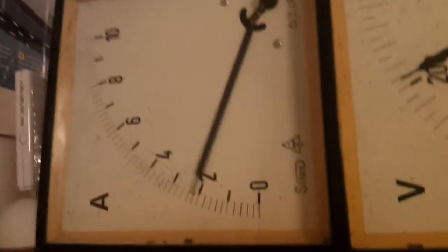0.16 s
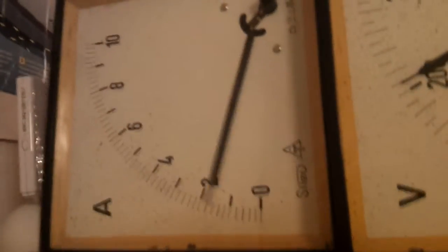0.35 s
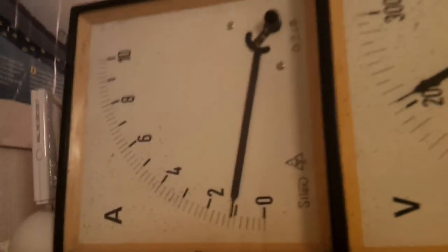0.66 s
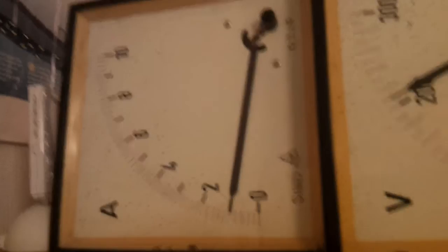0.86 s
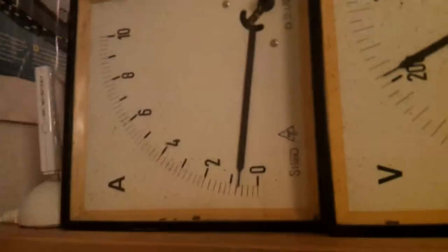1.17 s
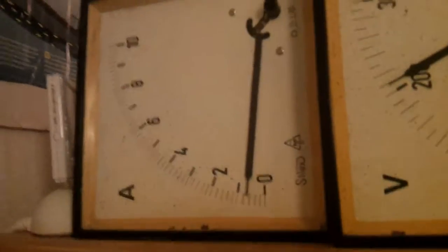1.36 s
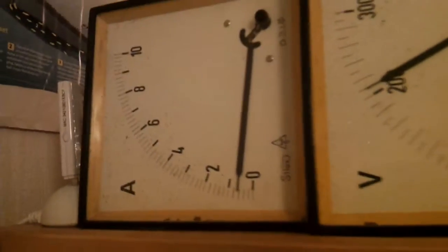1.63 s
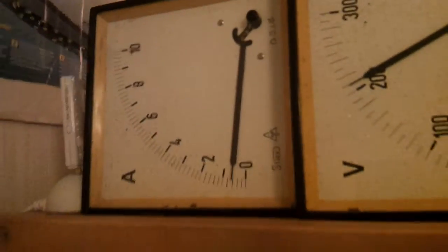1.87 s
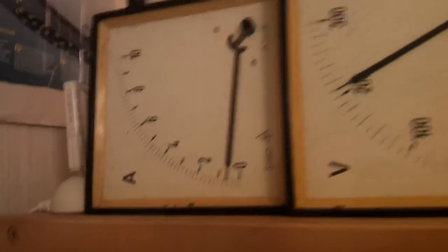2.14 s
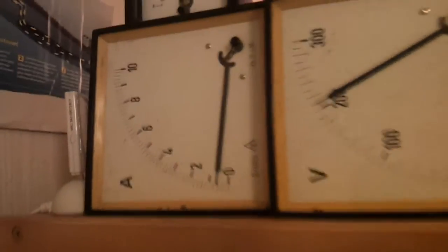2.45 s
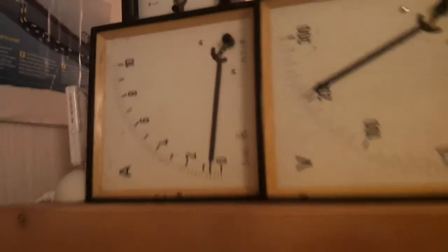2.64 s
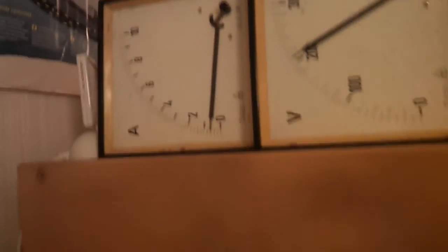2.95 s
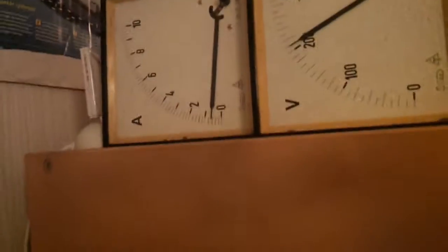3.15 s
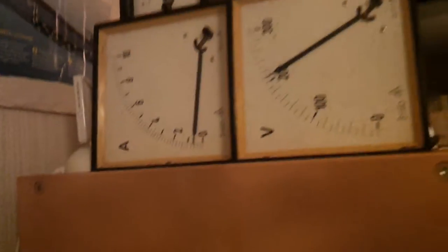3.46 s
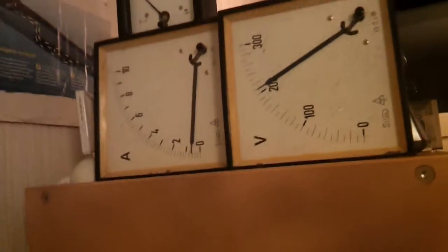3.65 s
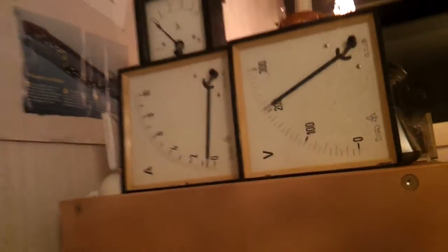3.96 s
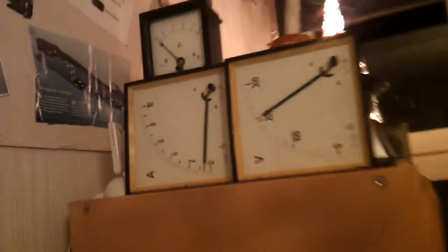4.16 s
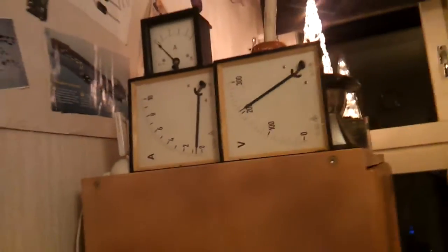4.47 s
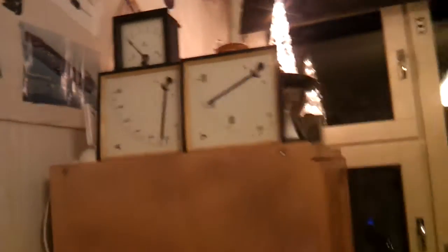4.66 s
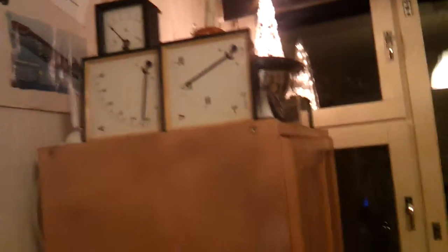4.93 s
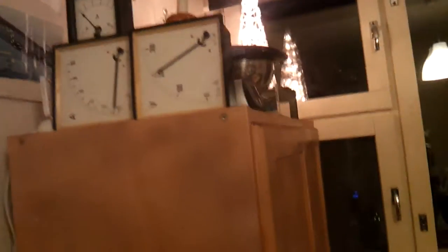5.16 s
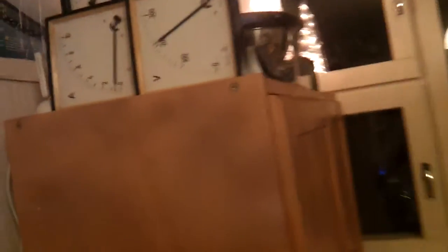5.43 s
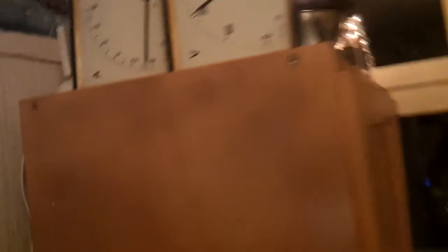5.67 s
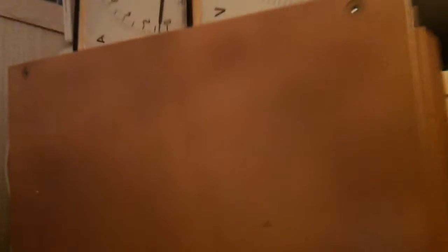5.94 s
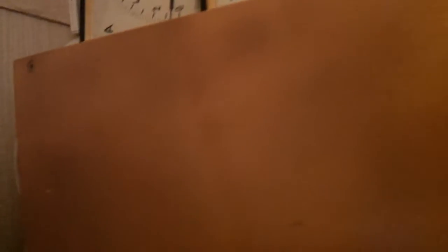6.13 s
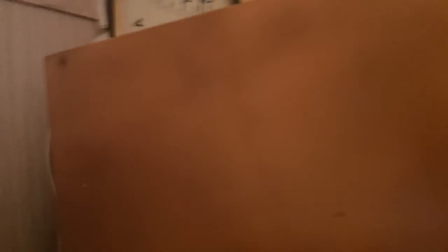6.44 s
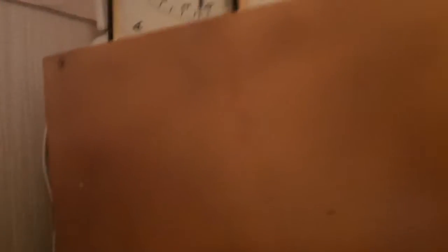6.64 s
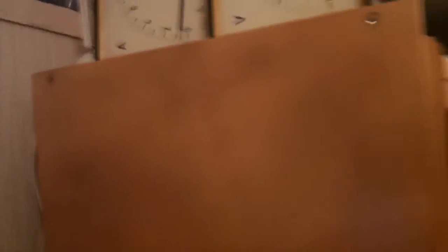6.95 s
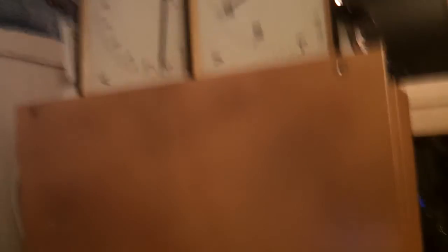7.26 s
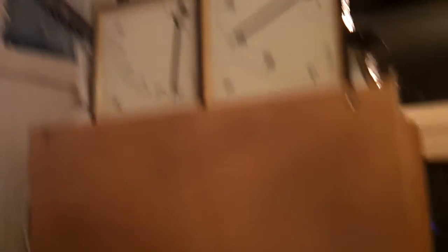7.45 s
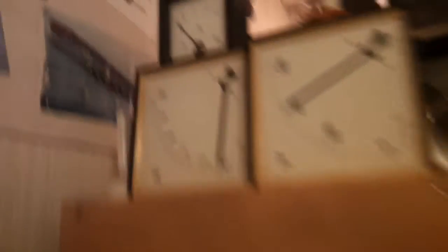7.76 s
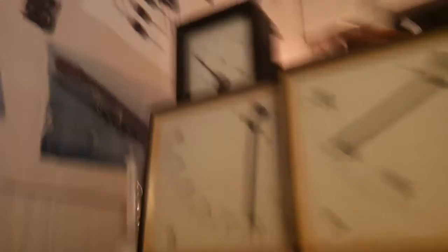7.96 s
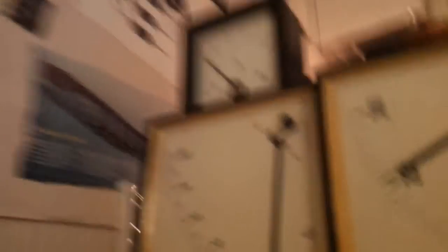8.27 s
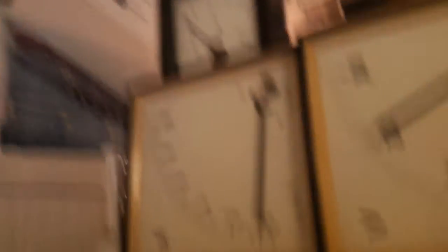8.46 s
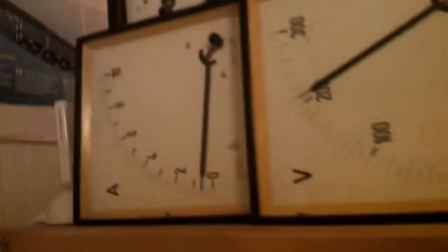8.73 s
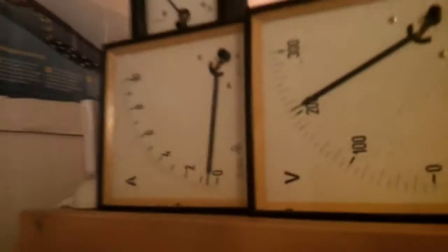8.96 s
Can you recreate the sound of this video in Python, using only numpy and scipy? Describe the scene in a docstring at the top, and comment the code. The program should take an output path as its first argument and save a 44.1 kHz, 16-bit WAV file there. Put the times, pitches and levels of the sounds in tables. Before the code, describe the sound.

Close hand-held pickup in a small, quiet room: a spinning motor runs down without power. A strong low hum, buzzing rasp and dry rubbing hiss drop smoothly in pitch and level, while a thin whistle sweeps down from the treble. One loud, hard snap comes late, preceded by a dull knock. The motor then fades to a low flutter and faint hiss, with soft bumps at the end.

```python
"""A fast motor, already switched off, hums and rasps down the scale in a small workshop, amid air and dry hiss.
The hum follows the shaft, the rasp repeats on every turn, and 36 rotor slots whistle as they drop into the band.
The tones swell across housing resonances and standing waves of the room, picked up by a hand-held microphone.
Late in the run-down a switch snaps once; dull handling knocks and a faint room drone lie around it."""
import sys
import numpy as np
from scipy import signal
from scipy.fft import rfft, irfft, next_fast_len
from scipy.io import wavfile

SR = 44100
rng = np.random.default_rng(int(sys.argv[2]) if len(sys.argv) > 2 else 0)


def wav_out(sig):
    """Save sig, one row per channel (or a flat mono array), as 16-bit PCM at SR to the path in sys.argv[1]."""
    wavfile.write(sys.argv[1], SR, np.round(np.clip(np.atleast_2d(sig).T, -1, 1) * 32767).astype(np.int16))


N = 401310
t = np.arange(N) / SR
SLOTS = 36  # rotor slots that pass on each turn
CONVERTER_HZ = 16000  # sampling rate of the narrow-band recorder

# how the housing radiates slot whistle and rasp: [f/Hz, level/dB]
HOUSING = [(100, -39), (250, -36), (500, -25), (650, -30), (780, -20.5), (950, -21), (1200, -23),
           (1600, -15.5), (2500, -11), (3500, -9.5), (4400, -9.5), (5500, -5), (6800, -1.5), (7500, -5.5),
           (8000, -18)]


def undb(db):
    """Decibels to gain."""
    return 10 ** (np.asarray(db) / 20)


def unit(x):
    """Scale to rms 1."""
    return x / np.sqrt(np.mean(x ** 2))


def curves(rows):
    """Each column of a table, joined by straight lines in time."""
    s, *columns = np.transpose(rows)
    return [np.interp(t, s, c) for c in columns]


def colour(x, points):
    """Filter by a spectrum of (Hz, dB) points, joined along a log frequency axis."""
    hz, db = np.transpose(points)
    size = next_fast_len(N + 4096)
    f = np.maximum(np.arange(size // 2 + 1) * SR / size, 1)
    gain = undb(np.interp(np.log(f), np.log(hz), db))
    return irfft(rfft(x, size) * gain, size)[:N]


def noise(points):
    """Coloured noise of rms 1."""
    return unit(colour(rng.standard_normal(N), points))


def walk(rate):
    """Random drift with a spread near 1: `rate` chance values a second, joined by straight lines."""
    return np.interp(t * rate, np.arange(2048), rng.standard_normal(2048))


def decay(s, t60, rise):
    """Envelope of a blow at time s: a rounded rise, then a fall of 60 dB in t60 seconds."""
    age = np.maximum(t - s, 0)
    fall = np.exp(-np.minimum(np.log(1000) * age / t60, 60))
    return (1 - np.exp(-age / rise)) * fall


def resonate(x, peaks):
    """Resonances (Hz, width Hz, dB) ring on top of what passes through; negative ones cut a notch."""
    out = x.copy()
    for hz, width, db in peaks:
        out += (undb(db) - 1) * signal.lfilter(*signal.iirpeak(hz, hz / width, fs=SR), x)
    return out


def ring_bodies(x):
    """Housing and bench ring where the sound meets their narrow resonances."""
    # housing and bench resonances: [f/Hz, width/Hz, boost/dB]
    bodies = [(390, 15, 8.5), (625, 45, 6), (1354, 16, 5.5), (1700, 200, 2.5), (2236, 29, 2.5),
              (2724, 90, 2), (3518, 62, 4), (4360, 160, 7)]
    return resonate(x, bodies)


def workshop(x, wet_db):
    """Direct sound plus dense treble reflections; a gliding tone beats with its own echoes."""
    t60_s = 0.19
    age = t[:SR // 2]
    tail = rng.standard_normal(len(age)) * np.exp(-np.log(1000) * age / t60_s)
    tail = signal.lfilter(*signal.butter(2, 1200, "high", fs=SR), tail)
    wet = signal.fftconvolve(x, tail / np.linalg.norm(tail))[:N]
    return (x + undb(wet_db) * wet) / np.hypot(1, undb(wet_db))


def room():
    """Quiet room: faint steady noise, with the body resonances in it, and a low drone that drifts in level."""
    # colour of the quiet room: [f/Hz, relative level/dB per Hz]
    quiet = [(20, -9.5), (70, -2.5), (130, -2.5), (220, -3.5), (390, 1.5), (500, -7), (650, 2), (900, -23),
             (1400, -21), (3000, -0.5), (8000, -20.5)]
    hiss = undb(-50.0) * unit(ring_bodies(noise(quiet)))
    drone = undb(-69.5 + 2 * walk(2.1)) * np.sin(2 * np.pi * 124 * t)
    return hiss + drone


def handling():
    """Soft knocks of handling: each blow rings at one pitch over a short scuff coloured around it."""
    # knocks: [t/s, level/dB, f/Hz]
    knocks = [(6.2, -39, 843), (8.53, -44.5, 263), (8.81, -42.5, 403), (9.03, -34.5, 391.6)]
    out = np.zeros(N)
    for s, db, hz in knocks:
        scuff = noise([(hz / 4, -16), (hz * .75, -5), (hz, 0), (hz * 1.4, -10), (hz * 3, -20), (hz * 12, -45)])
        out += undb(db) * decay(s, t60=0.28, rise=0.016) * (scuff + np.sin(2 * np.pi * hz * t))
    return out


def switch():
    """One snap in three close blows: lever modes ring, contacts crack and the cabinet thumps, each dying away."""
    # blows of the snap: [t/s, lever level/dB, crack level/dB, thump level/dB]
    blows = [(6.501, -21, -15, -47), (6.513, -16.5, -8.5, -37), (6.531, -21, -35, -33)]
    # ringing modes of the lever: [f/Hz, level/dB, t60/s]
    lever_modes = [(830, -1, .05), (1030, 7, 0.06), (1090, -4, 0.35), (1140, -27, .15)]
    # colour of the cracking contacts: [f/Hz, relative level/dB per Hz]
    crack_colour = [(60, -16), (250, -10.5), (500, -16.5), (1000, -5.5), (1800, -4.5), (3700, -7.5),
                    (5200, 1), (6500, -4), (7300, -12), (8000, -18)]
    # colour of the cabinet thump: [f/Hz, relative level/dB per Hz]
    thump_colour = [(30, -17), (85, -11), (100, -6), (135, 8), (235, -12), (330, -18), (1000, -25),
                    (4000, -59)]
    crack, thump, out = noise(crack_colour), noise(thump_colour), np.zeros(N)
    for s, lever_db, crack_db, thump_db in blows:
        for hz, db, t60 in lever_modes:
            ring = decay(s, t60, rise=0.00095) * np.sin(2 * np.pi * hz * (t - s))
            out += undb(lever_db) * undb(db) * ring
        out += undb(crack_db) * decay(s, t60=0.33, rise=0.002) * crack
        out += undb(thump_db) * decay(s, t60=0.51, rise=0.0053) * thump
    return out


def stirred_air(speed):
    """Air stirred by the rotor: unsteady noise whose amplitude falls about as the square of shaft speed."""
    # colour of the air: [f/Hz, relative level/dB per Hz]
    air_colour = [(20, 4.5), (80, -6), (200, -2), (500, -2.5), (900, -2), (2000, 3), (3500, 2), (5500, 3.5),
                  (7000, -8), (8000, -3)]
    return undb(-20.5 + 0.91 * walk(8.9)) * speed ** 1.99 * noise(air_colour)


def rubbing(angle):
    """Dry rubbing in the motor: flickering hiss that presses harder once a turn and rings the bodies."""
    # colour of the rubbing: [f/Hz, relative level/dB per Hz]
    rub_colour = [(200, -32.5), (900, -41), (1700, -14.5), (2700, -1), (3600, 4), (4350, -2), (5000, 6),
                  (6000, 6.5), (7000, 10), (7500, -2.5), (8000, -1)]
    # loudness of the rubbing: [t/s, level/dB]
    rub_level = [(0, -26), (.8, -25), (1.5, -22.5), (2.3, -34.5), (3, -28.5), (3.8, -31), (5.3, -27.5),
                 (5.7, -30.5), (6.2, -27.5), (7, -29.5), (7.4, -32), (7.8, -35), (8.3, -40.5), (9.1, -45)]
    rub_db, = curves(rub_level)
    pressure = 1 + 0.25 * np.sin(angle)
    return undb(rub_db + 0.8 * walk(38)) * pressure * unit(ring_bodies(noise(rub_colour)))


def low_tone(hz):
    """A gliding tone that swells each time it crosses a standing wave of the room."""
    # standing waves of the room: [f/Hz, width/Hz, level/dB]
    standing = [(83.4, 16, -30), (129, 10.2, -18), (146.3, 19, -23), (193, 3.8, -33.5), (234, 17.2, -12.5),
                (254.6, 12.8, -20), (293.8, 9.6, -19.5), (321.7, 24.4, -18.5)]
    power = sum((undb(db) / (1 + (2 * (hz - centre) / width) ** 2)) ** 2 for centre, width, db in standing)
    return np.sqrt(2 * power) * np.sin(2 * np.pi * np.cumsum(hz) / SR)


def shaft_hum(hz, speed):
    """Hum at shaft speed with a fainter tone of the bearing's ball cage; both weaken as the shaft slows."""
    cage_hz = .392 * hz  # the cage goes round at about two fifths of the shaft speed
    return speed ** 2.08 * (low_tone(hz) + undb(-16) * low_tone(cage_hz))


def slot_whistle(hz, angle):
    """Passing rotor slots sound a tone at 36 times shaft speed, ragged at low speed, through the housing."""
    # whistle ahead of the housing: [t/s, level/dB]
    whistle_level = [(2.3, -15), (3.5, -17.5), (4.4, -14.5), (4.9, -12), (5.4, -19.5), (6.6, -19.5),
                     (7.4, -31), (8.2, -38.5), (9, -48)]
    whistle_db, = curves(whistle_level)
    ragged = np.minimum((50 / hz) ** 3, 1)
    slots = np.sqrt(2) * np.sin(SLOTS * angle) * (1 + ragged * walk(120)) / np.hypot(1, ragged)
    return undb(whistle_db) * colour(slots, HOUSING)


def rasp(hz, turns, count=256, size=65536, channels=5):
    """The same uneven surface passes on every turn: a stack of shaft orders whose neighbours fade independently."""
    # orders that stand out or stay weak: {multiple of shaft speed: level/dB}
    order_db = {2: 12.5, 3: 6.5, 4: 7, 5: 2, 8: 0, 9: 4, 11: 4, 12: -3, 13: -1, 14: -4, 15: -3, 16: 2.5, 17:
                3, 18: 8, 19: -4, 20: -4, 22: 2, 23: -5, 24: 6, 25: 2, 26: 8.5, 27: 6.5, 30: 8.5, 37: 11,
                38: 3, 39: 5, 42: 7.5, 43: 6.5, 48: 7.5, 54: 7.5, 60: 8, 62: 5, 66: 5.5, 71: 7, 72: 15, 73:
                10, 74: 7, 108: 12, 109: 8, 114: 7, 144: 8}
    # one shaft order of 0 dB, ahead of the housing: [t/s, level/dB]
    rasp_level = [(0, -26), (2.4, -29.5), (3.5, -33.5), (4.6, -34), (5.4, -37.5), (6.3, -44), (7.7, -49.5),
                  (8.3, -54.5), (9.1, -66)]
    rasp_db, = curves(rasp_level)
    orders = np.arange(count)
    chance = rng.standard_normal((count, 2))
    db = np.array([order_db.get(k, 1.2 * chance[k, 0]) for k in orders])
    # spectrum of one turn; an order of 0 dB has rms 1
    lines = undb(db) * np.exp(2j * np.pi * chance[:, 1]) * size / np.sqrt(2)
    lines[[0, 1, SLOTS]] = 0  # hum and whistle sound on their own
    # the orders swell and sink as the hand-held microphone moves
    fade_db, fades_per_s = 2.5, 7
    fades = [unit(undb(fade_db * walk(fades_per_s))) for _ in range(channels)]
    place = (turns * size).astype(int) % size
    out = np.zeros(N)
    for group in np.split(orders, 8):
        # a group of high orders fades in as its lowest one sinks from 11.2 to 9.2 kHz
        audible = np.clip((CONVERTER_HZ * .7 - group[0] * hz) / 2000, 0, 1)
        for k, fade in enumerate(fades):
            one_turn = irfft(lines * np.isin(orders, group[k::channels]), size)
            out += audible * fade * one_turn[place]
    return undb(rasp_db) * colour(out, HOUSING)


def motor():
    """Hum, whistle, rasp, air and rubbing follow one slowing shaft; tones flare as they cross resonances."""
    # run-down of the shaft: [t/s, turns a second f/Hz]
    run_down = [(0, 328.7), (0.7, 298.3), (1.4, 268.7), (2.1, 240.9), (2.8, 214.2), (3.5, 188.5),
                (4.2, 162.9), (4.9, 137.9), (5.6, 114.6), (6.3, 92.6), (7, 72), (7.7, 52.3), (8.3, 35.5),
                (9.1, 18.2)]
    # pitches where paths from motor to microphone add up or cancel: [f/Hz, width/Hz, level/dB]
    paths = [(305, 100, -11), (375, 40, 1), (495, 50, 5), (620, 60, 3), (760, 80, -3), (1000, 60, -3),
             (1160, 70, 8), (1250, 50, -6), (1520, 100, -5), (1680, 90, 3), (2000, 150, 4), (2480, 160, -7),
             (4030, 150, -3), (4330, 220, 6.5), (5100, 250, -2), (5600, 200, 2.5), (6150, 250, -3)]
    hz, = curves(run_down)
    speed = hz / hz[0]
    # the shaft trembles more as it slows, which blurs the highest orders
    turns = np.cumsum(hz) / SR + 0.00046 * walk(70) * (1 + 60 / hz)
    angle = 2 * np.pi * turns
    tones = ring_bodies(slot_whistle(hz, angle) + rasp(hz, turns))
    tones = workshop(resonate(tones, paths), wet_db=-1.5)
    return stirred_air(speed) + rubbing(angle) + shaft_hum(hz, speed) + tones


def scene():
    """Quiet room, handling, switch and motor together on one channel."""
    return (room() + handling() + switch() + motor())[None]


def record(dry):
    """A narrow-band recorder: tones near its upper edge mirror upward faintly and loud peaks are rounded off."""
    edge = signal.firwin(61, 7600, fs=SR, window=("kaiser", 5))
    narrow = signal.fftconvolve(dry, edge[None], mode="same")
    # a tone at f reappears at the converter rate minus f
    mirror = 2 * np.cos(2 * np.pi * CONVERTER_HZ * t) * narrow
    mirror = colour(mirror[0], [(7600, -34.5), (8000, 2.5), (8300, -10.5), (8700, -21.5), (9100, -44), (9600, -88.5)])
    wide = narrow + mirror
    clean = np.clip(wide, -.62, .62)
    rounded = clean + .18 * np.tanh((wide - clean) / .18)
    top = signal.ellip(8, .2, 70, 16000, fs=SR, output="sos")  # low-pass at 16 kHz
    return signal.sosfilt(top, rounded)


dry = scene()
out = record(dry)
wav_out(out)
```